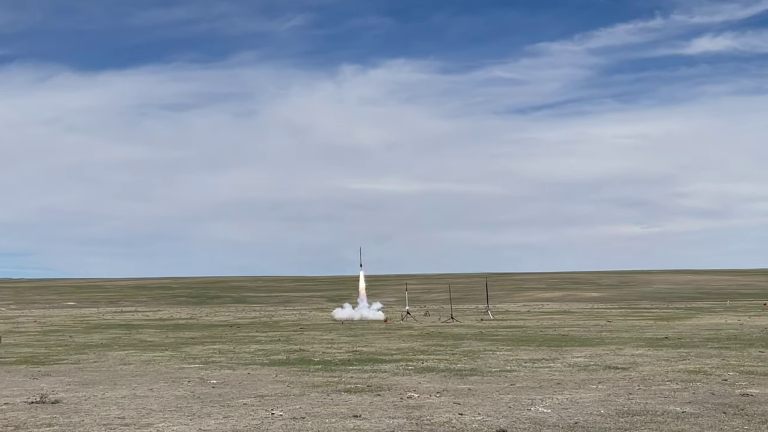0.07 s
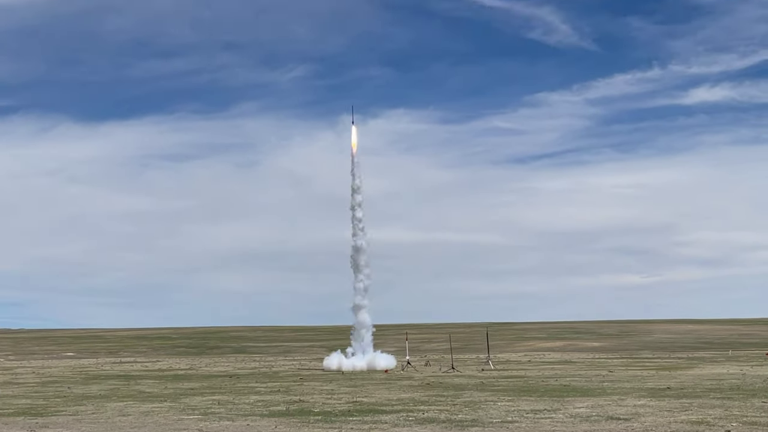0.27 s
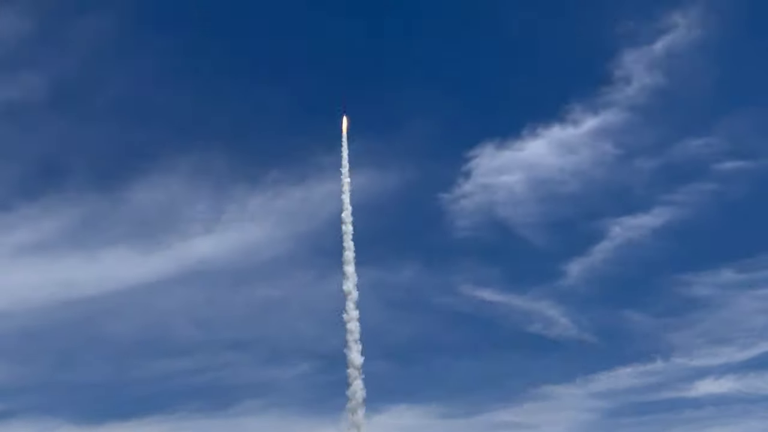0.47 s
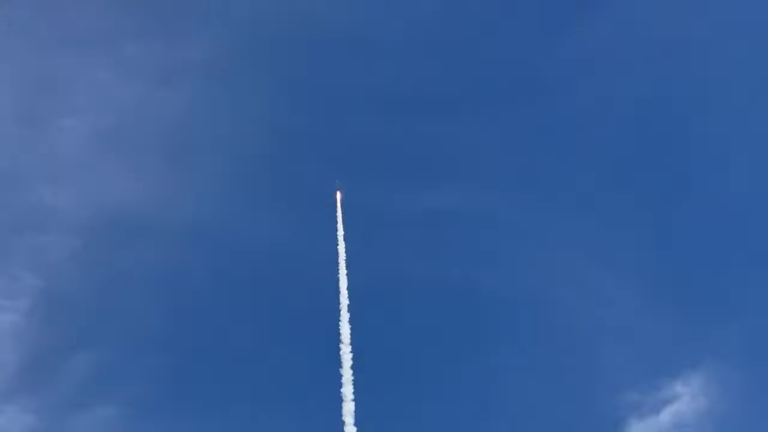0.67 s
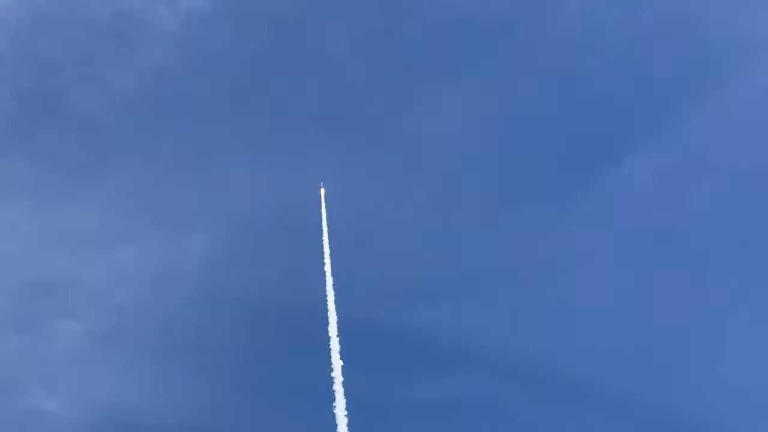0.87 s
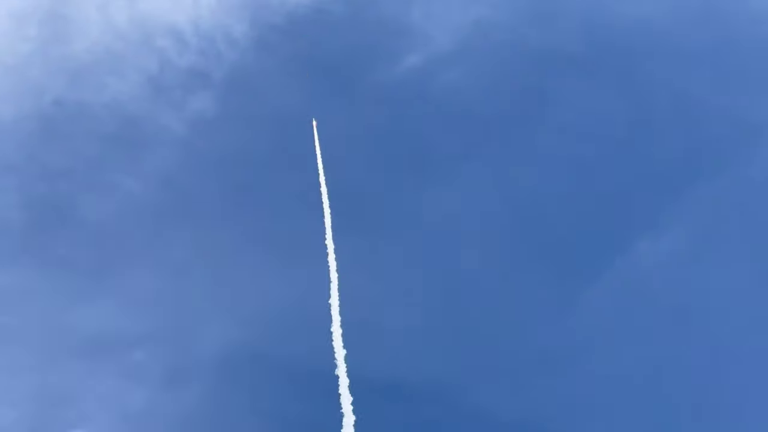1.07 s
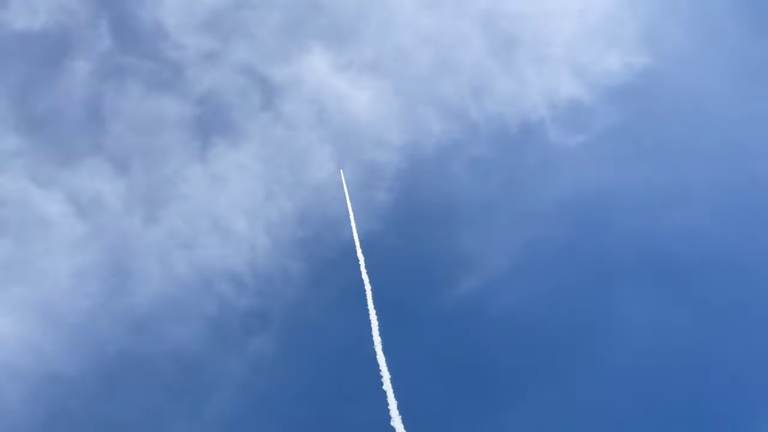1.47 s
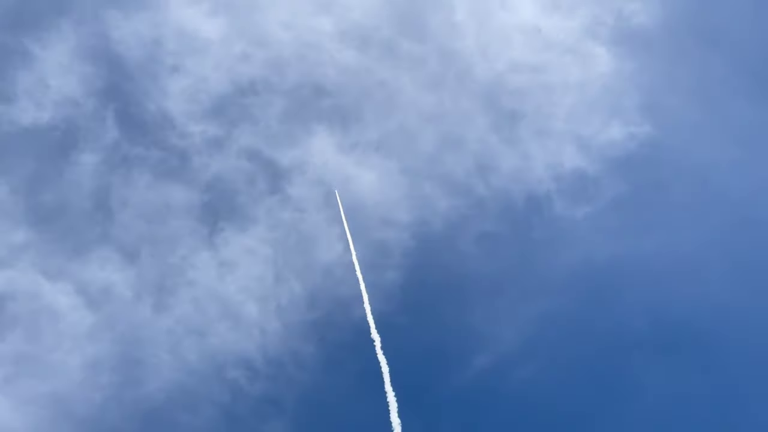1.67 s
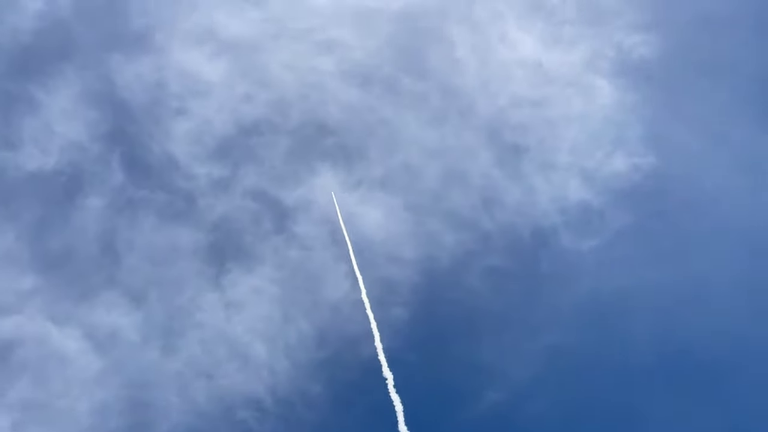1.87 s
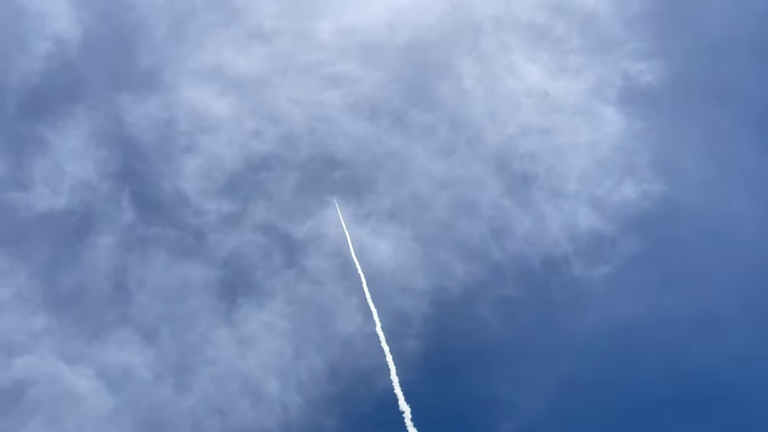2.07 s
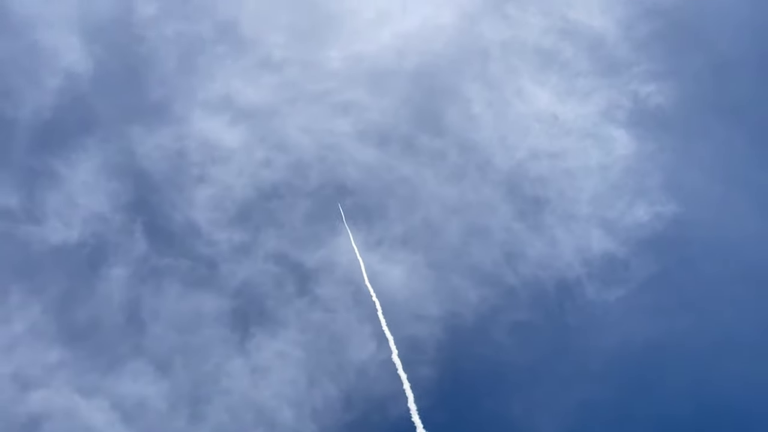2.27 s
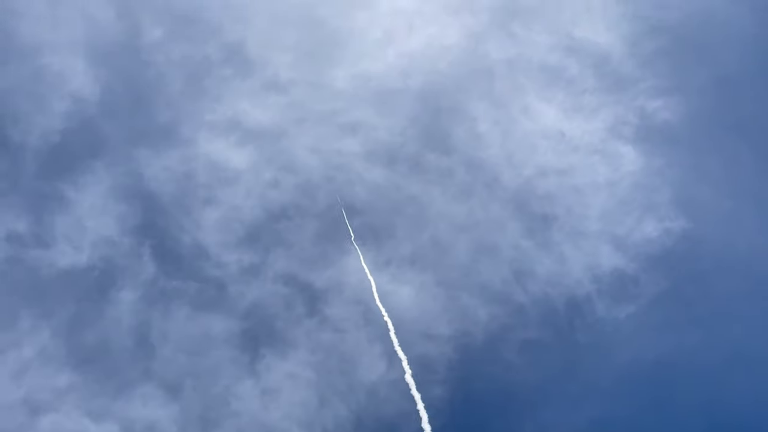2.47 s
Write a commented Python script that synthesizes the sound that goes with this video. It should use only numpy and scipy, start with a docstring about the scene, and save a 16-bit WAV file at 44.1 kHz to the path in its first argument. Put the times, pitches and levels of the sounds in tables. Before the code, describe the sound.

A rocket motor hisses, fires with a sudden bang and roars upward with scattered pops. Heard from the ground across a field, the roar takes on a sweeping tone, growing deeper, duller and fainter above a faint breeze.

```python
"""A model rocket lifts off from a grass field, heard some way off on a close pair of microphones.
Over a light wind the motor hisses as it lights, then its flame blasts against the pad.
It climbs with a crackling jet roar, and shocks in the exhaust pop now and then.
As it rises, the echo off the grass lags more and more, sweeping a comb through the roar.
Far overhead the roar has sunk in pitch, dulled by the air, and the plume rumbles."""
import sys
import numpy as np
from scipy import signal
from scipy.fft import rfft, irfft
from scipy.io import wavfile
from scipy.ndimage import map_coordinates

SR = 44100
rng = np.random.default_rng(int(sys.argv[2]) if len(sys.argv) > 2 else 0)


def store_pcm(level_fs):
    """Save levels as 16-bit WAV."""
    pcm = np.round(np.clip(level_fs, -1, 1) * 32767).astype(np.int16)
    wavfile.write(sys.argv[1], SR, np.atleast_2d(pcm).T)


N = 110250
TIME, FREQS = np.arange(N) / SR, np.fft.rfftfreq(N, 1 / SR)

# Noise colours at the microphone. Each row: frequency in Hz, relative density in dB.
WIND_SPECTRUM = [(20, -31.5), (80, 9.5), (170, 13), (280, 5), (420, -31.5), (900, -23), (3000, -42),
                 (12000, -77)]
RUMBLE_SPECTRUM = [(30, -22), (90, -2), (260, 5), (600, -3), (1200, -10), (1900, -28.5), (4000, -41),
                   (10000, -105)]
PAD_SPECTRUM = [(25, -29.5), (70, -9.5), (170, -1.5), (380, -1.5), (600, -17.5), (1200, -17), (5000, -52.5)]  # exhaust striking the pad
FLAME_SPECTRUM = [(700, -13), (1250, -4), (1620, -12), (1880, 1), (2080, -3), (2350, 3), (2900, -13),
                  (3500, 0), (3850, -5), (4250, -2), (4950, -10), (5650, 0), (6900, -5), (7800, -18),
                  (12000, -25)]  # hollow tone of the flame at the blast plate
# How the noises swell and fade. Each row: time in seconds, level in dB.
HISS_LEVELS = [(0, -78.5), (.08, -65.5), (.15, -53.5), (.215, -56), (.235, -36), (.26, -140)]
PAD_LEVELS = [(.17, -76.5), (0.208, -44.5), (0.238, -40), (0.25, -2), (.28, -18), (0.358, -16.5),
              (.405, -33.5), (.5, -37.5), (.62, -37), (.8, -140)]
BLAST_LEVELS = [(.21, -140), (0.227, -54), (0.238, -16.5), (.33, -22), (.42, -25.5), (.5, -140)]
RUMBLE_LEVELS = [(1.02, -140), (1.19, -33.5), (1.29, -51), (1.43, -39.5), (1.66, -43), (1.85, -54),
                 (2.219, -56), (2.289, -41.5), (2.5, -54.5)]
# The climb, heard from the ground. Each row: time in seconds, roar level in dB, corner of the jet's
# hump in Hz, treble lost in the air at 6 kHz in dB (negative brightens).
CLIMB = [(.19, -100, 500, 0), (.228, -39.5, 495, -27), (.241, -35, 500, -2), (.29, -14.5, 520, -3.5),
         (.36, -10.5, 728, 1.5), (.42, -15, 1060, 2), (.46, -16.5, 895, -0.5), (.56, -16, 676, 0),
         (.61, -16.5, 556, -4), (.66, -17.5, 395, -0.5), (.8, -21, 284, 3.5), (.83, -21, 300, 1),
         (.95, -18.5, 270, 4), (1.07, -26.5, 210, 5), (1.23, -29.5, 188, 13), (1.37, -32, 214, 18.5),
         (1.45, -39.5, 180, 17), (1.53, -35.5, 196, 18), (1.62, -40.5, 154, 24), (1.73, -38.5, 187, 25.5),
         (1.84, -35, 243, 29.5), (1.91, -38, 233, 40.5), (1.98, -39.5, 254, 28), (2.22, -42.5, 257, 30),
         (2.32, -46.5, 239.5, 53), (2.5, -43, 277.5, 80)]
# Single exhaust shocks. Each row: start in seconds, peak in dB, body in Hz, loss at 6 kHz in dB.
EXHAUST_POPS = [(0.24, -8.5, 320, -10), (0.2448, -4.5, 259, 42), (.251, -5, 290, 45), (0.2557, -4, 169, 60),
                (.268, -14, 295, 45), (.598, -1, 597, -15), (.6095, -5, 885, -14), (.617, -8.5, 890, -12),
                (0.693, -8.5, 484, 29), (.768, -12, 500, 16), (.773, -9, 405, 14), (.794, -8, 380, 6),
                (.8165, -10.5, 420, 14), (.828, -9, 400, 14), (.903, -9, 400, 3), (.921, -10, 380, 20),
                (1.033, -13, 300, 12), (1.049, -15, 300, 25), (1.102, -15, 413, 14), (1.105, -13, 360, 18),
                (1.169, -14, 260, 24), (1.179, -14, 242, 91), (1.235, -18, 300, 20), (1.4035, -23, 240, 9),
                (1.441, -21, 330, 150), (1.493, -19, 400, 9), (1.4975, -19.5, 195, 95),
                (1.538, -21, 360, 21), (1.569, -23.5, 310, 150), (1.607, -26, 298, 124),
                (1.612, -27.5, 299, 117), (1.6306, -21.5, 328, 112), (1.685, -27, 299, 114)]
# Colour of the microphone. Each row: frequency in Hz, gain in dB.
MIC_COLOUR = [(100, 3.5), (700, 2), (1100, 2), (1500, 2), (2050, -0.5), (2450, -7.5), (2800, -10.5),
              (3450, -9), (4500, -10.5), (5600, -9), (6900, -14.5), (7800, -20), (8900, -15), (10300, -14),
              (11700, -24), (13000, -36)]
# The longer path by way of the grass. Each row: time in seconds, echo lag in ms.
GROUND_LAG = [(.24, 0.52), (.4, 0.63), (.47, 1.36), (.55, 1.87), (.65, 3.05), (.8, 5.1), (.9, 5.96),
              (1.0, 7.5), (1.2, 9.0), (1.4, 10.5), (1.8, 10.9), (2.5, 13.9)]
# Phase between the microphones. Each row: frequency in Hz, lead of the left in radians.
MIC_PHASE = [(20, 0), (1980, -.12), (3450, -.55), (5170, -.7), (7240, -.4), (8100, -.7), (8870, .1),
             (9470, 2.0), (10400, 3.1), (11300, 6.2)]
# Balance of the pair. Each row: frequency in Hz, left minus right in dB.
MIC_BALANCE = [(60, .5), (300, .3), (650, .9), (1200, .7), (2150, 0)]
# Sound the two microphones do not share. Each row: frequency in Hz, relative level in dB.
MIC_UNSHARED = [(60, -25), (300, -25.5), (1300, -18.5), (2800, -58.5), (6000, -9), (12000, -26.5)]


def amp(db):
    """Decibels to gain."""
    return 10 ** (np.asarray(db) / 20)


def unit(x):
    """Scales to an rms of one."""
    return x / np.sqrt(np.mean(x ** 2) + 1e-20)


def curve(table, times, column=1):
    """One column of a table at the given times."""
    table = np.array(table)
    return np.interp(times, table[:, 0], table[:, column])


def spectrum(points, hz):
    """Reads (Hz, value) points on a log-frequency axis."""
    point_hz, values = np.transpose(points)
    return np.interp(np.log(hz + 1), np.log(point_hz + 1), values)


def noise(points):
    """Steady noise of a given spectrum."""
    white = rfft(rng.standard_normal(N))
    return unit(irfft(white * amp(spectrum(points, FREQS)), N))


def burst(points, levels):
    """Noise of a given spectrum that follows a level curve."""
    return noise(points) * amp(curve(levels, TIME))


def flutter(times, slow_hz, fast_hz):
    """Random wavering between two rates."""
    rates = np.geomspace(slow_hz, fast_hz, 30)[:, None]
    cycles = rates * times + rng.random(rates.shape)
    return unit(np.sin(2 * np.pi * cycles).sum(0))


def jet_gain(hz, corner_hz, loss_db, fall, rise=2.7):
    """A jet's spectral hump, dulled by the air; rise and fall are powers of frequency."""
    ratio = (hz + 1) / corner_hz
    hump = ratio ** rise / np.sqrt(1 + ratio ** (2 * (rise + fall)))
    air = (hz / 6000) ** 1.61
    air = np.where(np.asarray(loss_db) < 0, np.minimum(air, 1), air)  # a lift levels off at 6 kHz
    return hump * amp(spectrum(MIC_COLOUR, hz) - loss_db * air)


def wind(level_db=-58):
    """Light, steady wind over the field."""
    return amp(level_db) * noise(WIND_SPECTRUM)


def plume_rumble():
    """The plume's low rumble, reaching the microphone once the rocket points away."""
    return burst(RUMBLE_SPECTRUM, RUMBLE_LEVELS)


def ignition(rasp_db=2, hiss_db_per_octave=4):
    """The motor catches with a thin hiss; its jet strikes the pad and tears at the blast plate."""
    sputter = unit(amp(rasp_db * flutter(TIME, slow_hz=40, fast_hz=401)))
    thin_flame = [(hz, db + hiss_db_per_octave * np.log2(hz)) for hz, db in FLAME_SPECTRUM]
    hiss = burst(thin_flame, HISS_LEVELS)
    pad = burst(PAD_SPECTRUM, PAD_LEVELS)
    blast = burst(FLAME_SPECTRUM, BLAST_LEVELS) * sputter
    return hiss + pad + blast


def exhaust_pops(size=4096, trail_hz=700, wake_share=.7, wake_decay_s=.005, wake_low_hz=1000):
    """Each shock arrives as a steep front, a falling swing of its low body and a short ragged wake."""
    out, hz = np.zeros(N + size), np.fft.fftfreq(size, 1 / SR)
    trail = np.exp(-12j * np.arctan(hz / trail_hz))  # all-pass: the bass trails the front
    wakes = rng.standard_normal((len(EXHAUST_POPS), size)) * np.exp(-TIME[:size] / wake_decay_s)
    wake_highpass = hz / (hz - 1j * wake_low_hz)
    for (start, peak_db, body_hz, loss_db), wake in zip(EXHAUST_POPS, wakes):
        log_gain = np.log(jet_gain(abs(hz), body_hz, loss_db, fall=.75) + 1e-4)
        front = np.exp(np.conj(signal.hilbert(log_gain)))  # minimum phase keeps the onset steep
        ragged = 1 + wake_share * np.fft.fft(wake / np.linalg.norm(wake)) * wake_highpass
        shock = np.fft.ifft(front * trail * ragged).real
        out[round(start * SR):][:size] += amp(peak_db) * shock / abs(shock).max()
    return out[:N]


def jet_roar(shocks_per_s=1500, spread_db=4, crackle_db=-5, crackle_end_s=1.7):
    """Turbulent noise and a hail of small shocks, deeper and duller with distance."""
    strikes = rng.random(N) < shocks_per_s / SR
    shocks = strikes * amp(spread_db * np.minimum(rng.exponential(1, N), 4))
    crackle = amp(crackle_db) * unit(shocks) * (TIME < crackle_end_s)
    drive = unit(rng.standard_normal(N) + crackle)
    hz, times, frames = signal.stft(drive, SR, nperseg=512, noverlap=384)
    corner_hz, loss_db = curve(CLIMB, times, column=2), curve(CLIMB, times, column=3)
    colour = jet_gain(hz[:, None], corner_hz, loss_db, fall=.31)
    colour /= np.sqrt(np.mean(colour ** 2, axis=0))
    # Turbulence on the way to the microphone shakes the treble, and the level a little.
    treble_db = 2.5 * np.minimum(hz[:, None] / 5000, 1) * flutter(times, slow_hz=7, fast_hz=60.46)
    waver_db = .2 * flutter(TIME, slow_hz=12, fast_hz=90.4)
    _, roar = signal.istft(frames * colour * amp(treble_db), SR, nperseg=512, noverlap=384)
    return roar[:N] * amp(curve(CLIMB, TIME) + waver_db)


def with_ground_echo(direct, share, grazing_ms=1, scatter_ms=13, top_hz=4200):
    """Adds the echo off the grass, softer in the treble and later as the rocket rises."""
    moving_air = 1 + .018 * flutter(TIME, slow_hz=4, fast_hz=24.99)
    lag_ms = curve(GROUND_LAG, TIME) * moving_air
    # Weak at short lags, skimming the grass, and at long ones, scattered by rough ground.
    strength = share * lag_ms / np.hypot(lag_ms, grazing_ms) / (1 + (lag_ms / scatter_ms) ** 4)
    softened = irfft(rfft(direct) / np.hypot(1, FREQS / top_hz), N)
    echo = map_coordinates(softened, [np.arange(N) - lag_ms * SR / 1000], order=3)
    return (direct + strength * echo) / np.hypot(1, strength)


def microphone_pair(sound):
    """Two closely spaced microphones: alike in the bass, drifting apart in the treble."""
    mid = rfft(sound)
    side = rfft(sound * flutter(TIME, slow_hz=31, fast_hz=324)) * amp(spectrum(MIC_UNSHARED, FREQS))
    tilt = amp(spectrum(MIC_BALANCE, FREQS) / 2)
    turn = np.exp(-1j * spectrum(MIC_PHASE, FREQS))
    left, right = (mid + side) * tilt, (mid - side) * turn / tilt
    return irfft(np.array([left, right]), N)


def scene():
    """The launch from across the field: rocket and ground echo over a light wind."""
    motor = with_ground_echo(ignition() + jet_roar() + plume_rumble(), share=.6)
    pops = with_ground_echo(exhaust_pops(), share=.35)
    return microphone_pair(wind() + motor + pops)


def record(dry):
    """The recorder rounds off the loudest peaks, then cuts the top treble."""
    ceiling, edge_hz = .88, 12250
    rounded = dry / (1 + (dry / ceiling) ** 4) ** (1 / 4)
    lowpass = signal.firwin(511, edge_hz, window=("kaiser", 9), fs=SR)
    return signal.oaconvolve(rounded, lowpass[None], "same")


dry = scene()
out = record(dry)
store_pcm(out)
```